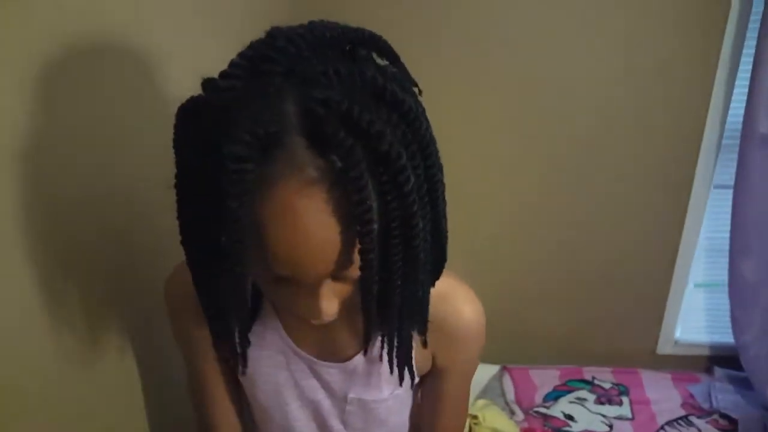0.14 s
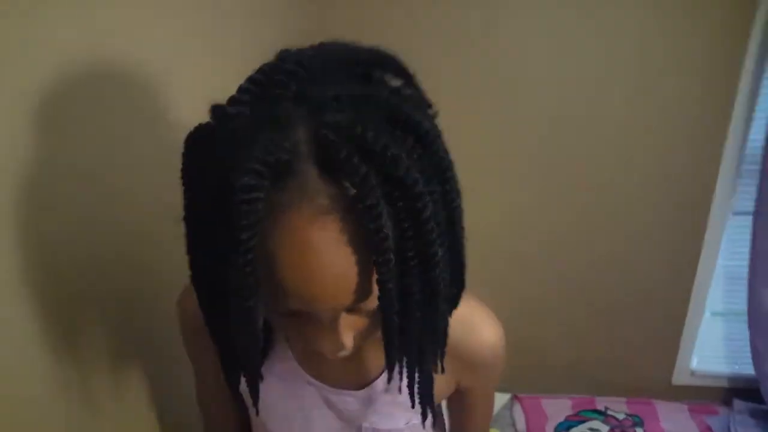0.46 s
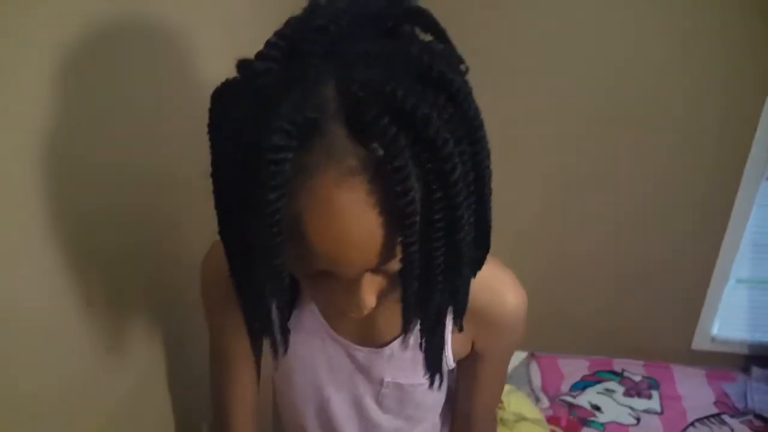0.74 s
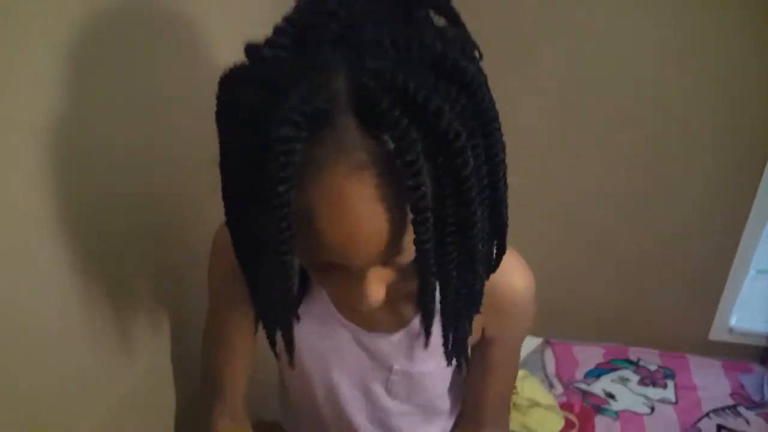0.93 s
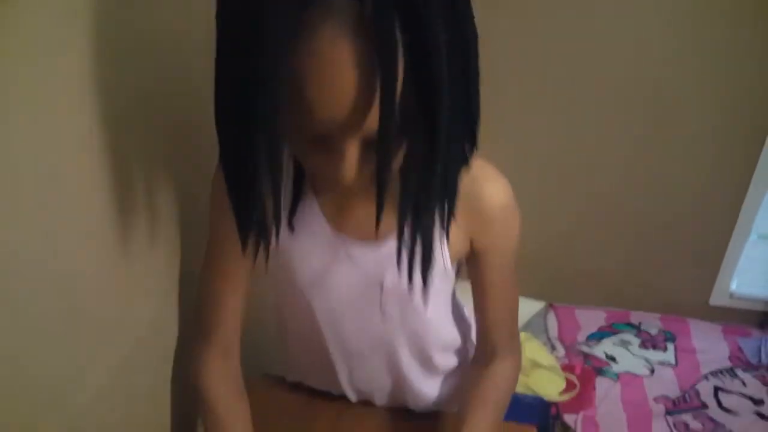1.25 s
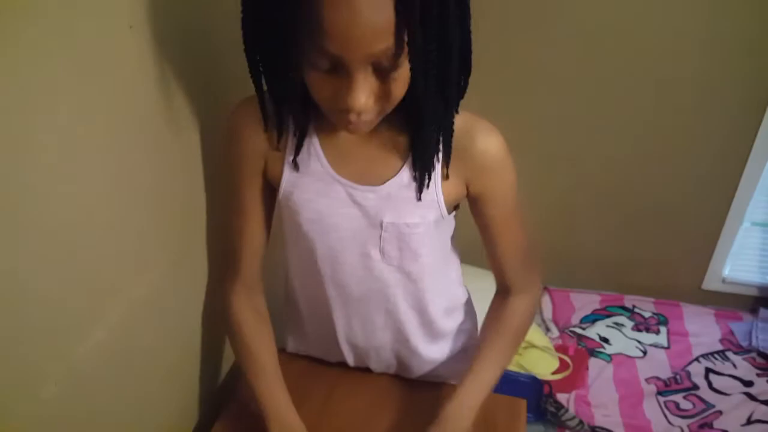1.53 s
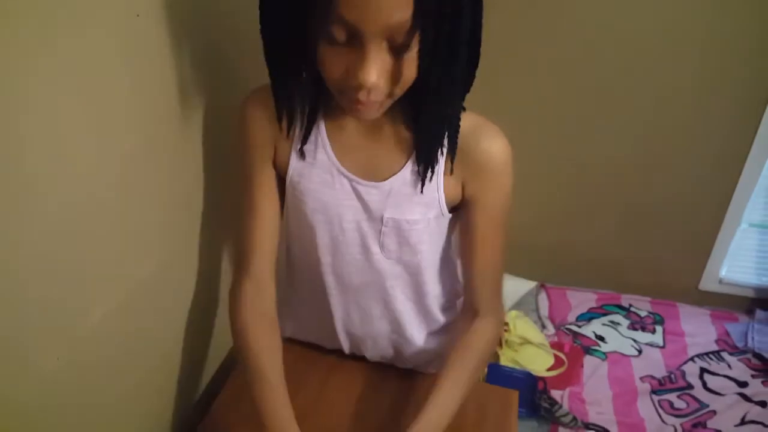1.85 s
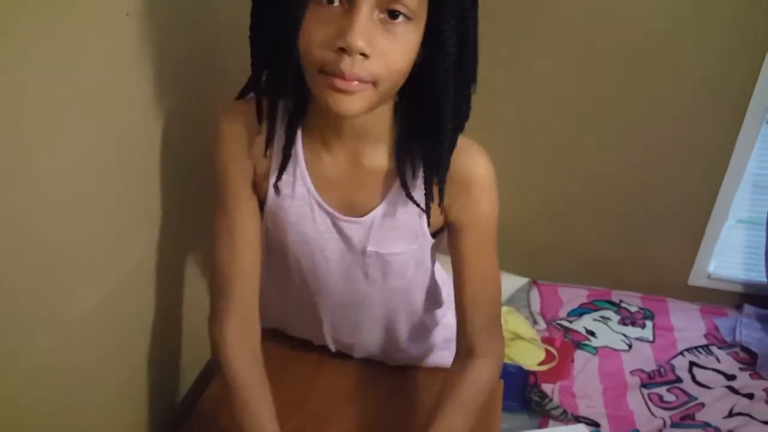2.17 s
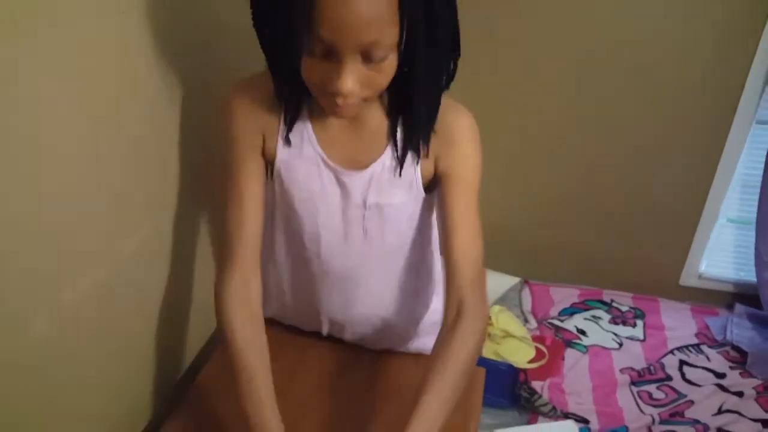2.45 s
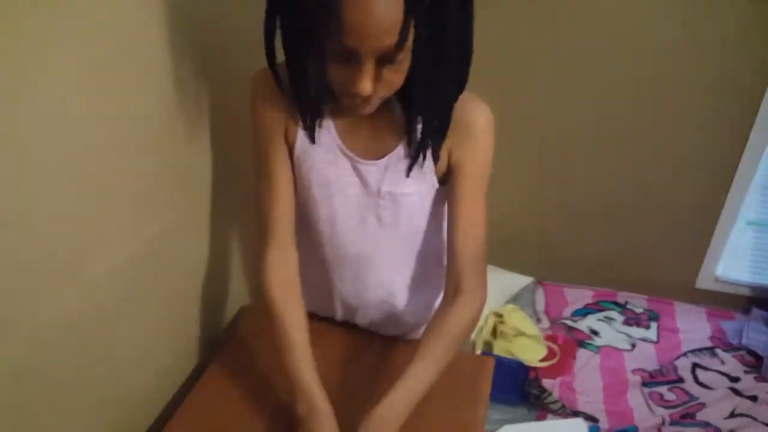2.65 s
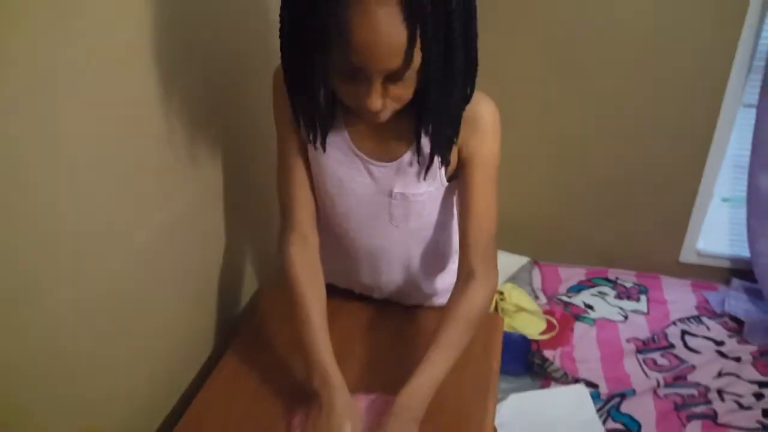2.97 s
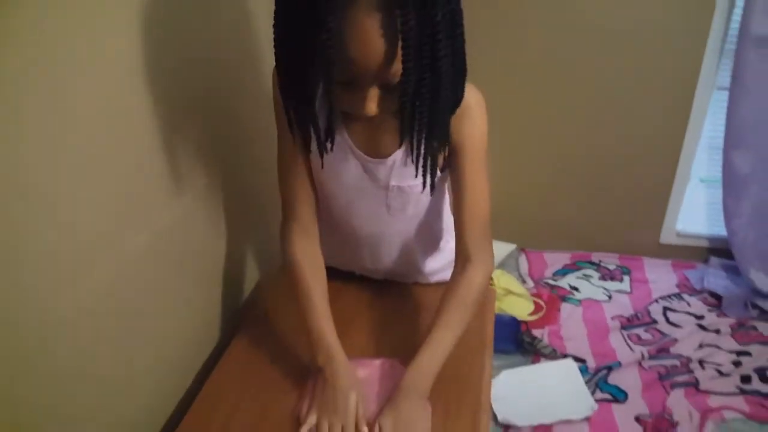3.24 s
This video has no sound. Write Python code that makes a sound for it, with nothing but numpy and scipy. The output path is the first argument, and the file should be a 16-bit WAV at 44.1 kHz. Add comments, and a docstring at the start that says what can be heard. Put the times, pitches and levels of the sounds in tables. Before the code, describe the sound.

Slime is pressed on a wooden desk: a burst of sharp air-bubble pops first, then faint squelches and isolated pops, then a strong hollow thump; small quiet bedroom, phone about a metre away.

```python
"""Slime is kneaded on a wooden desk, over a quiet room hum and a fine rub of slime that rises and falls throughout.
Air pockets burst as short ringing pops with noisy cracks, and palms thump the modes of the hollow desk.
Squeezes squelch and crackle as dense random grains, filtered dull, wet and bright.
The place is a small bedroom whose walls answer with echoes and a short tail; a phone listens a metre away."""
import sys
import numpy as np
from scipy import signal
from scipy.fft import rfft, irfft
from scipy.io import wavfile
from scipy.ndimage import map_coordinates

SR = 44100
rng = np.random.default_rng(int(sys.argv[2]) if len(sys.argv) > 2 else 0)


def generate_wav(sig):
    """Save sig (samples, or channels by samples) to the path in sys.argv[1] as 16-bit PCM at SR."""
    pcm = np.round(np.clip(np.atleast_2d(sig).T, -1, 1) * 32767).astype(np.int16)
    wavfile.write(sys.argv[1], SR, pcm)


N = 149940

# room hum spectrum: pitch_hz, level_db
HUM_TONE = [(15, -29), (25, 7), (200, -5), (400, -13.5), (1050, -19), (2500, -30), (6380, -36.5),
            (15500, -42.5)]
# difference between left and right in diffuse sound: pitch_hz, side_re_mid_db
SIDE_TONE = [(60, -17.5), (250, -9.5), (1000, 1.5), (4000, -0.5), (14000, -3)]
# steady rubbing of slime on skin and wood: time_s, level_db
RUB_LEVELS = [(.3, -58.5), (.6, -64), (.93, -59.5), (1.1, -71.5), (1.5, -59.5), (1.9, -81.5),
              (2.171, -68.5), (2.501, -56), (3.0, -58.5), (3.4, -59)]
# spectrum of the rubbing: pitch_hz, level_db
RUB_TONE = [(60, -11), (110, 11.5), (500, -2.5), (1100, -13), (1930, -1.5), (2900, -9.5), (3600, -14),
            (4000, -12.5), (6000, -28.5)]
# bursting air pockets: start_s, ring_db, pitch_hz, overtone_re_ring_db, crack_db
POPS = [(0.032, -53, 1740, 14, -47), (0.0991, -67, 1570, -12, -36), (0.1202, -36, 1960, -15, -31.5),
        (0.1634, -38, 1250, -11, -49), (0.2042, -11.5, 1960, -39, -11), (0.2251, -25.5, 1840, -22, -23),
        (0.2402, -38.5, 2100, -13.5, -34.5), (0.2725, -63, 1760, -5, -15.5), (0.5143, -38, 2030, -8.5, -61),
        (1.0322, -34.5, 1930, -6, -27.5), (1.1392, -48.5, 1880, -24, -46.5),
        (1.1754, -60, 2020, -14.5, -49.5), (1.3911, -46, 1050, 11, -42), (2.137, -51, 1500, -14, -51),
        (2.19, -48.5, 1510, -15.5, -61.5), (2.2887, -20.5, 1776, -30, -42.5), (2.5727, -41, 1080, -17, -48),
        (3.138, -19, 1990, 2.5, -33)]
# spectrum of bright cracks and crackle: pitch_hz, level_db
BRIGHT_TONE = [(2500, -7.5), (4200, -5), (5200, -5), (6800, 0.5), (8500, 1.5), (10000, -9), (12500, -4.5),
               (16000, -18)]
# palms on the desk: start_s, peak_db, contact_s
THUMPS = [(0.127, -42, 0.00032), (0.417, -43, 0.0068), (0.503, -43, 0.0019), (0.7, -55.5, 0.012),
          (1.029, -37.5, 0.0026), (1.385, -37.5, 0.0051), (1.418, -44, 0.014), (2.133, -44.5, 0.011),
          (2.309, -35, 0.002), (2.338, -39, 0.0035), (2.577, -22.5, 0.0037), (2.61, -25.5, 0.004),
          (2.748, -38, 0.008), (2.784, -32, 0.0031), (2.811, -33, 0.0047), (2.997, -37.5, 0.0024)]
# modes of the hollow desk: pitch_hz, level_db, t60_s
DESK_MODES = [(103.76, -7.5, 0.77), (136, -5, 0.097), (160.6, 1, 0.049), (183, 1, 0.066), (270, -6, 0.084),
              (470, -8.5, 0.03), (624, -12, 0.033)]
# squeezes of the slime: start_s, swell_s, fade_s, dull_db, wet_db, bright_db
SQUEEZES = [(0.151, 0.0071, 0.036, -51.5, -54, -51), (0.203, 0.004, 0.14, -68, -53, -41),
            (0.386, 0.034, 0.083, -55.5, -58.5, -57.5), (0.47, 0.044, 0.023, -64.5, -58, -65.5),
            (1.03, 0.0012, 0.064, -46.5, -53, -61), (1.289, 0.106, 0.018, -55, -58, -55.5),
            (1.456, 0.0097, 0.077, -49.5, -58.5, -104), (1.606, 0.007, 0.065, -47.5, -50.5, -71),
            (1.82, 0.0083, 0.075, -59, -68.5, -101), (2.211, 0.055, 0.11, -54.5, -67.5, -78),
            (2.292, 0.021, 0.049, -48, -56.5, -74.5), (2.389, 0.035, 0.041, -56.5, -52, -58),
            (2.45, 0.018, 0.024, -47, -51, -57.5), (2.567, 0.0043, 0.096, -44, -58, -62.5),
            (2.759, 0.046, 0.31, -45.5, -54.5, -67), (2.997, 0.0056, 0.11, -52.5, -55, -66),
            (3.23, 0.0033, 0.11, -49.5, -62.5, -71), (3.333, 0.025, 0.031, -51.5, -55.5, -62)]
# spectrum of the dull squelch: pitch_hz, level_db
DULL_TONE = [(80, -23), (150, 4.5), (300, 8.5), (550, 4.5), (900, -3.5), (1800, -38)]
# spectrum of the wet middle: pitch_hz, level_db
WET_TONE = [(500, -18), (1200, 3.5), (1950, 0.5), (2700, -12.5), (3700, -13.5), (5500, -19.5), (9000, -47)]
# echoes of the desk, near wall and far wall: delay_s, level_db
ECHOES = [(.0043, -12), (.0085, -25), (0.019, -17.5)]

HUM_DB = -61
DULL_PER_S, WET_PER_S, BRIGHT_PER_S = 1500, 4000, 5000  # mean grain rates
GRAIN_SPREAD_DB = 1.5
POP_T60_S, CRACK_T60_S, OVERTONE_T60_S = 0.007, 0.006, 0.003
OVERTONE_RATIO = 2.13
PALM_REST_S, DESK_LINGER = 0.06, 0.15  # damping time, share of the ring left undamped
DESK_DETUNE, MODE_SPREAD_DB = 0.015, 2.0  # pitch spread as a fraction, level spread
SWELL_BEND = 0.9  # exponent on the squeeze envelope
TAIL_DB, TAIL_T60_LOW_S, TAIL_T60_HIGH_S = -14, 0.2, 0.2
TAIL_SPLIT_HZ, SOFT_HZ = 2500, 8300
PORT_LAG_S = 0.00004
BASS_CUT_HZ, TOP_HZ, LEFT_DB = 57, 16000, 0.96  # LEFT_DB is left over right


def undb(db):
    """Turn decibels into an amplitude factor."""
    return 10 ** (np.asarray(db) / 20)


def unit(x):
    """Scale to an RMS of one."""
    return x / np.sqrt(np.mean(x ** 2))


def colour(x, tone):
    """Filter by (pitch_hz, level_db) points joined on a log frequency axis."""
    n = x.shape[-1]
    points_hz, points_db = np.array(tone, float).T
    hz = np.maximum(np.arange(n // 2 + 1) * SR / n, 1)
    gain_db = np.interp(np.log(hz), np.log(points_hz), points_db)
    return irfft(rfft(x) * undb(gain_db), n)


def fade(t, t60):
    """Exponential decay, down 60 dB after t60 seconds."""
    return np.exp(-np.log(1000) * t / np.maximum(t60, 1e-3))


def add(out, x, start_s):
    """Mix x into out at start_s, trimmed at the end."""
    i = int(start_s * SR)
    out[..., i:i + x.shape[-1]] += x[..., :N - i]


def wide(mid, side):
    """Left and right from two unrelated signals; the bass is nearly alike on both."""
    side = colour(side, SIDE_TONE)
    return np.array([mid + side, mid - side])


def grains(per_s):
    """Dense random single-sample clicks of uneven size and either sign."""
    hit = rng.random(N) < per_s / SR
    size = undb(GRAIN_SPREAD_DB * rng.exponential(size=N))
    return hit * rng.standard_normal(N) * size


def room_hum():
    """Steady wide noise, weighted towards the bass, fills the quiet room."""
    mid, side = colour(rng.standard_normal((2, N)), HUM_TONE)
    return wide(mid, side) * undb(HUM_DB) / np.std(mid)


def rubbing():
    """Filtered grains make a fine diffuse hiss and a low desk murmur as the mass slides and stretches."""
    time_s, level_db = np.array(RUB_LEVELS).T
    friction = np.array([grains(BRIGHT_PER_S), grains(BRIGHT_PER_S)])
    hiss = wide(*colour(friction, RUB_TONE))
    return unit(hiss) * undb(np.interp(np.arange(N) / SR, time_s, level_db))


def pops():
    """Each pocket rings a few cycles, with a shorter overtone and a crack of bright noise."""
    out, t = np.zeros((2, N)), np.arange(1024) / SR
    rise = 1 - np.exp(-(t / 0.00025) ** 2)
    for start_s, ring_db, pitch_hz, overtone_db, crack_db in POPS:
        phase = 2 * np.pi * pitch_hz * t
        ring = np.sin(phase) * fade(t, POP_T60_S)
        overtone = np.sin(OVERTONE_RATIO * phase) * fade(t, OVERTONE_T60_S)
        ring += undb(overtone_db) * overtone
        noise = wide(*colour(rng.standard_normal((2, 1024)), BRIGHT_TONE))
        crack = unit(noise) * fade(t, CRACK_T60_S) * undb(crack_db)
        add(out, rise * (undb(ring_db) * ring + crack), start_s)
    return out


def thumps():
    """A soft push of the palm rings the modes of the desk, neighbours in opposite sense."""
    out, t = np.zeros(N), np.arange(SR // 2) / SR
    # the resting palm damps the ring
    damping = DESK_LINGER + 1 / (1 + (t / PALM_REST_S) ** 6)
    for start_s, peak_db, contact_s in THUMPS:
        ring = np.zeros(len(t))
        for k, (pitch_hz, level_db, t60_s) in enumerate(DESK_MODES):
            level_vary, pitch_vary = rng.standard_normal(2)
            level = (-1) ** k * undb(level_db + MODE_SPREAD_DB * level_vary)
            hz = pitch_hz * (1 + DESK_DETUNE * pitch_vary)
            ring += level * fade(t, t60_s) * np.sin(2 * np.pi * hz * t)
        push = np.sin(np.pi * np.clip(t[:1024] / max(contact_s, 0.0005), 0, 1)) ** 2
        hit = signal.fftconvolve(ring, push)[:len(t)] * damping
        add(out, undb(peak_db) * hit / np.abs(hit).max(), start_s)
    return out


def kneading():
    """Sticky threads tear in grains: dull, wet and bright ones swell and fade together in each squeeze."""
    t, power = np.arange(N) / SR, np.zeros((3, N))
    for start_s, swell_s, fade_s, *levels_db in SQUEEZES:
        peak_s = start_s + swell_s
        shape = np.interp(t, [start_s, peak_s, peak_s + fade_s], [0, 1, 0])
        power += (undb(levels_db)[:, None] * shape ** SWELL_BEND) ** 2
    dull_env, wet_env, bright_env = np.sqrt(power)
    dull = unit(colour(grains(DULL_PER_S), DULL_TONE)) * dull_env
    wet = unit(colour(grains(WET_PER_S), WET_TONE)) * wet_env
    bright = unit(colour(grains(BRIGHT_PER_S), BRIGHT_TONE)) * bright_env
    return dull + wet + bright


def bedroom(x):
    """Desk and walls return a few clear echoes along with a short diffuse tail."""
    t = np.arange(SR // 2) / SR
    noise = rng.standard_normal((2, len(t)))
    low = signal.sosfilt(signal.butter(1, TAIL_SPLIT_HZ, fs=SR, output="sos"), noise)
    tail = low * fade(t, TAIL_T60_LOW_S) + (noise - low) * fade(t, TAIL_T60_HIGH_S)
    tail *= np.clip(t / 0.0007 - 1, 0, 1)  # silent for 0.7 ms, then a 0.7 ms rise
    # bedding swallows the top
    mid, side = signal.sosfilt(signal.butter(1, SOFT_HZ, fs=SR, output="sos"), tail)
    response = undb(TAIL_DB) * wide(mid, side) / np.sqrt(np.sum(mid ** 2))
    for delay_s, level_db in ECHOES:
        response[:, int(delay_s * SR)] += undb(level_db)
    return signal.fftconvolve(x[None], response, axes=1)[:, :N]


def scene():
    """Pops and kneading reach both ports and excite the room; thumps, rubbing and hum join them."""
    near = pops() + kneading()
    # the far port hears later, by a fraction of a millisecond
    late = map_coordinates(near[1], [np.arange(N) - PORT_LAG_S * SR], mode="mirror")
    direct = np.array([near[0], late])
    return room_hum() + rubbing() + direct + thumps() + bedroom(near.mean(axis=0))


def record(dry):
    """The phone's microphones thin the bass, lean a little left and cut the top."""
    thin = signal.sosfilt(signal.butter(3, BASS_CUT_HZ, "high", fs=SR, output="sos"), dry)
    leaning = thin * undb([[LEFT_DB / 2], [-LEFT_DB / 2]])
    return signal.sosfilt(signal.ellip(8, 0.5, 60, TOP_HZ, fs=SR, output="sos"), leaning)


dry = scene()
out = record(dry)
generate_wav(out)
```